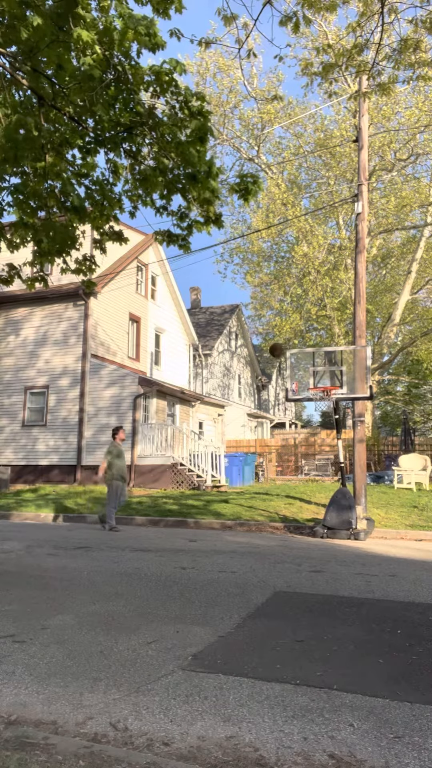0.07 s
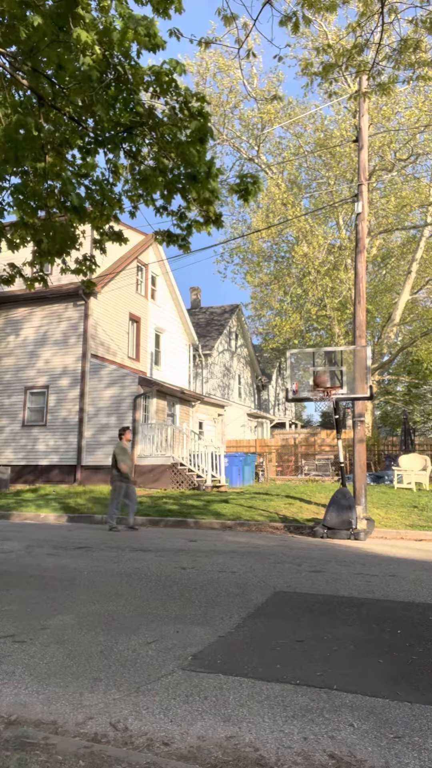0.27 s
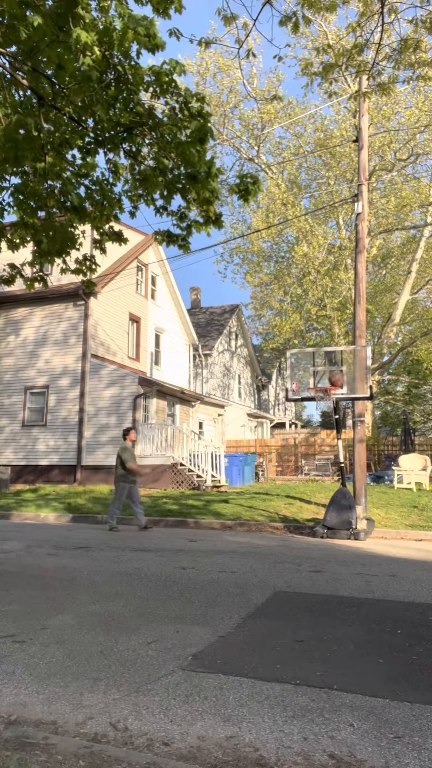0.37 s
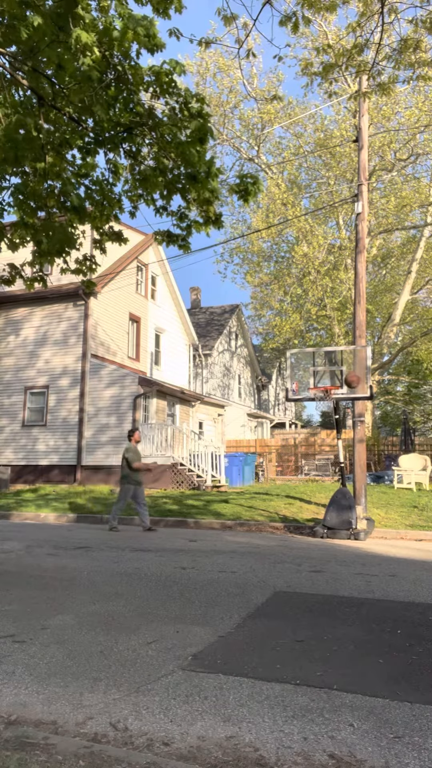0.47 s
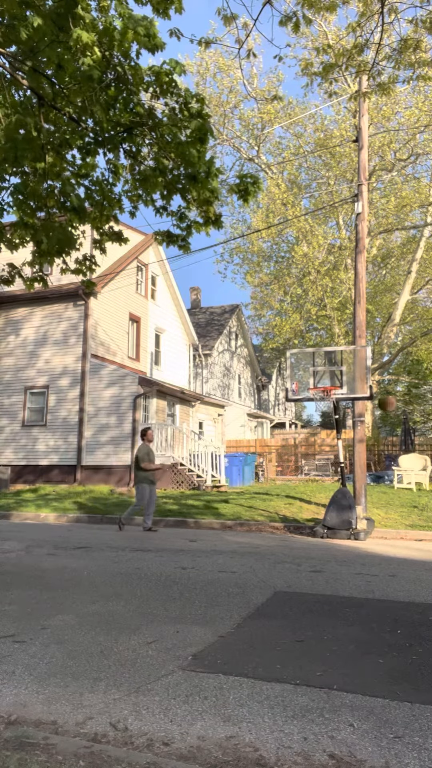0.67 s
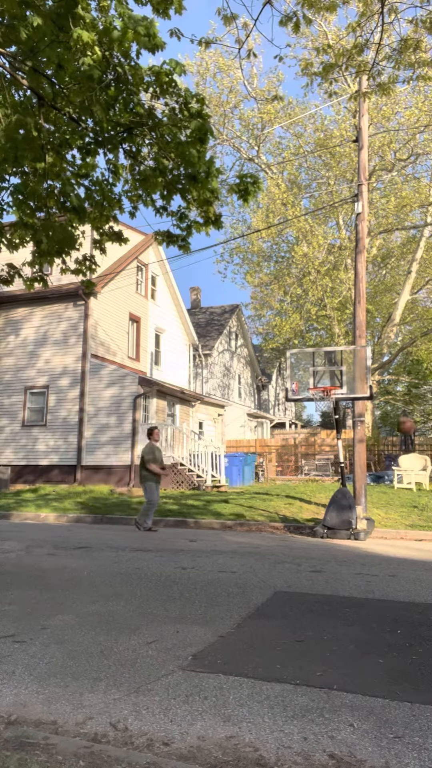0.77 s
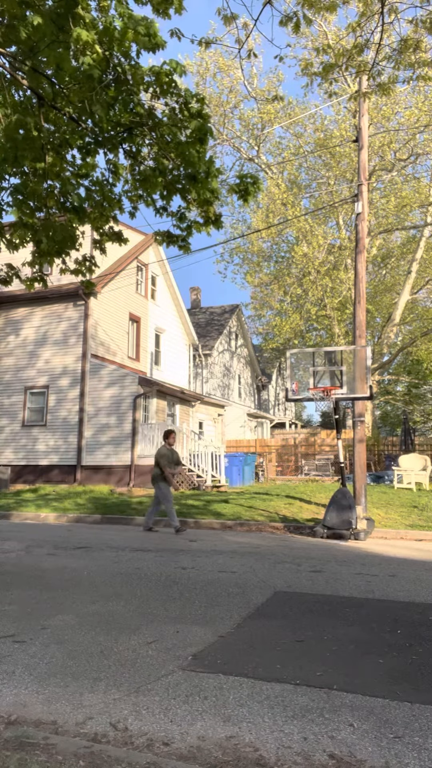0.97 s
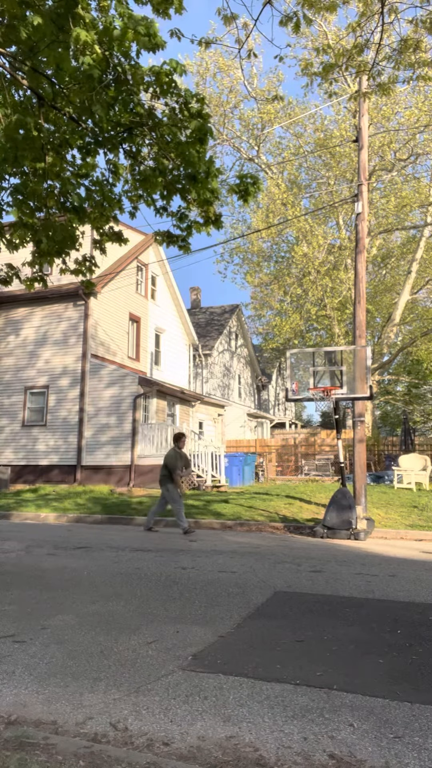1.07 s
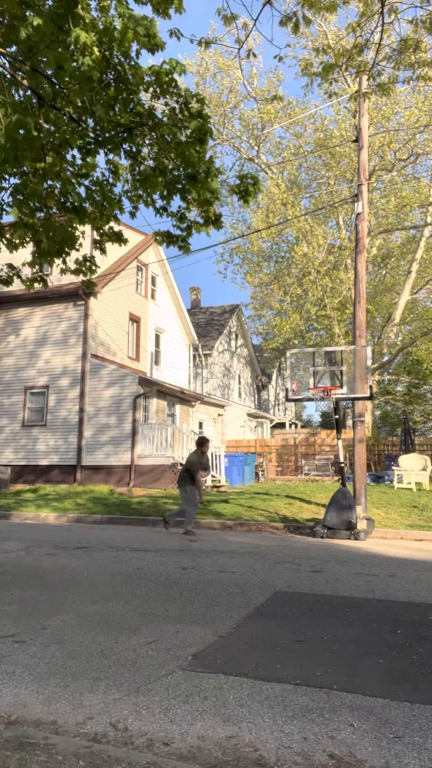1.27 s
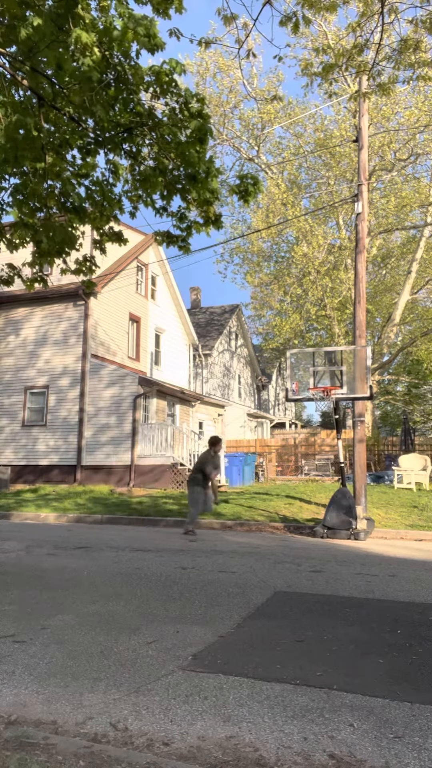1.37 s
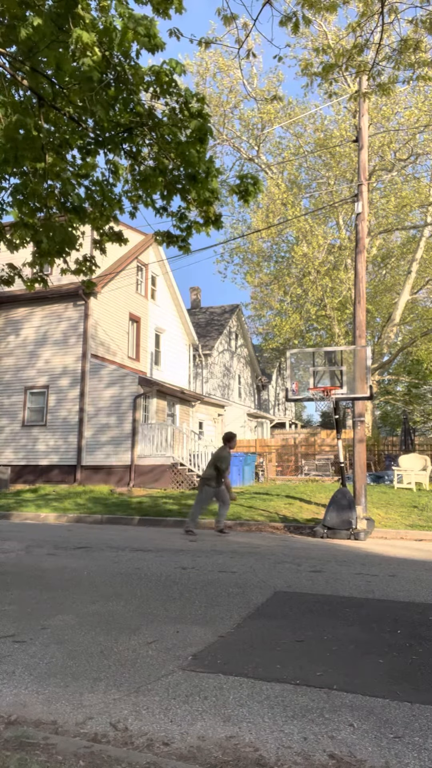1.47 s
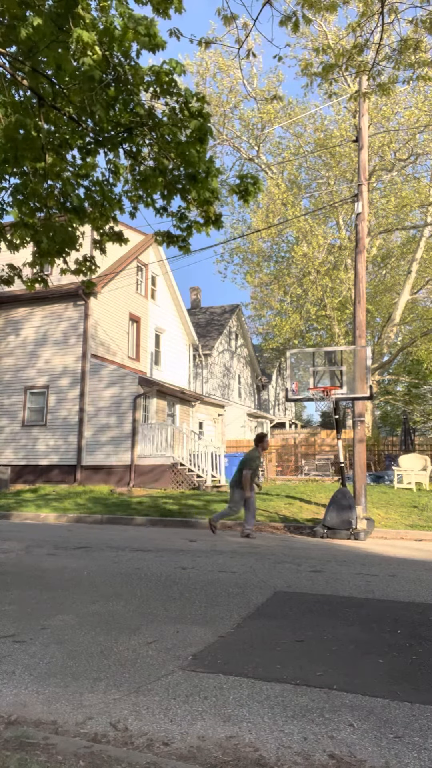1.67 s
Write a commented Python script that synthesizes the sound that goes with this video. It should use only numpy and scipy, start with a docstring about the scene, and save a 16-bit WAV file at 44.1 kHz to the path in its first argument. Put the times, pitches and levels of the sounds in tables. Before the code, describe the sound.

A basketball bangs off a backboard and rim outdoors, then bounces once amid light footsteps.

```python
"""Far birds whistle over a low outdoor rumble. A basketball crashes into a portable hoop:
the board booms, the rim and its fittings rattle, and the house fronts throw the sound back.
While the frame drones and the net hisses away, a shoe scuffs the asphalt.
The ball bounces once on the street: its skin slaps and the air inside it rings.
A few more gritty steps follow."""
import sys
import numpy as np
from scipy import signal
from scipy.fft import rfft, irfft
from scipy.io import wavfile

SR = 44100
rng = np.random.default_rng(int(sys.argv[2]) if len(sys.argv) > 2 else 0)


def pcm_store(signal):
    """Save signal as 16-bit PCM."""
    levels = np.round(np.clip(np.atleast_2d(signal), -1, 1) * 32767)
    wavfile.write(sys.argv[1], SR, levels.astype(np.int16).T)


N = 74970
T = np.arange(N) / SR
HZ = np.fft.rfftfreq(2 * N, 1 / SR)
HIT_S, BOUNCE_S = .2438, 1.054  # the ball hits the hoop, then the street


# Ringing tones of the hoop: pitch_hz, level_db, rise_s, fade_s
HOOP_TONES = [(57.9, -31.5, .03, 2.0), (130.9, -23.5, 0.03, .6), (196.1, -19.5, .008, 0.6),
              (215.6, -10.5, 0.01, .4), (241.6, -10.5, .008, 0.11), (260.3, -18, .012, 0.36),
              (314, -21.5, 0.0043, 0.19), (379.7, -28.5, 0.013, 0.38), (422.6, -33.5, .01, 0.14),
              (628, -10.5, .007, .13), (776, -19.5, 0.0014, 0.11), (840.5, -14.5, 0.0018, 0.11),
              (915, -25.5, 0.0017, 0.15), (1261, -25, 0.0035, 0.2), (1586, -26.5, .002, .1),
              (3514, -35.5, .001, .11)]
# Swells as board and frame bend: peak_s, pitch_hz, level_db, width_s
HOOP_BOOMS = [(0.261, 139.4, -23.5, 0.021), (.2717, 225.7, -6, 0.0084), (.344, 134.7, -21, .02),
              (0.474, 130.5, -23, 0.033)]

def hoop_body():
    """The struck board, rim and frame boom and ring."""
    return ring(HIT_S, HOOP_TONES) + sum(thump(*row) for row in HOOP_BOOMS)


# Touches of ball, board and rim: start_s, level_db, fade_s
CONTACTS = [(.224, -41.5, 0.12), (.2355, -24, 0.27), (.2438, -15, 0.022), (.261, -19, 0.054),
            (.383, -43.5, .07), (.548, -51, 0.12)]
# Tone colour of the clatter and of the loose fittings: pitch_hz, level_db
CLATTER_COLOUR = [(100, -4), (400, 7.5), (520, 4), (800, 9), (1080, 1.5), (1800, 5), (2500, -3),
                  (5000, -10), (7100, -7), (8300, -32.5), (10500, -28), (12000, -25), (15000, -31.5)]

def hoop_clatter():
    """The ball grinds into board and rim."""
    return filtered(bursts(CONTACTS), colour(CLATTER_COLOUR))


def rattle(level_db=-22.5, fade_s=.28, jangle_db=1.5, jangle_hz=120):
    """Loose fittings jangle on unevenly after the hit."""
    jangle = evened(filtered(rng.standard_normal(N), np.exp(-(HZ / jangle_hz) ** 2)))
    shaking = diffuse() * amp(level_db + jangle_db * jangle) * fade(HIT_S, fade_s)
    return filtered(shaking, colour(CLATTER_COLOUR))


# The frame's many low tones, blurred together: pitch_hz, level_db
FRAME_COLOUR = [(60, -27.5), (120, 0), (170, 2), (230, -2), (290, -5), (420, -11.5), (520, -19.5),
                (2000, -54)]
# Hiss of the net: pitch_hz, level_db
NET_COLOUR = [(1000, -14.5), (6500, -0.5), (9000, -15.5), (11800, -2.5), (14000, -4.5), (15200, -21)]

def frame_and_net(frame_db=-23, net_db=-58, rise_s=.02):
    """The frame drones unevenly while the shaken net hisses away."""
    swell = 1 - np.exp(-np.maximum(T - HIT_S, 0) / rise_s)
    frame = diffuse() * amp(frame_db) * swell * fade(HIT_S, fade_s=.87)
    net = diffuse() * amp(net_db) * fade(HIT_S, fade_s=.9)
    return filtered(frame, colour(FRAME_COLOUR)) + filtered(net, colour(NET_COLOUR))


# The ball's slap and two close echoes: start_s, level_db, fade_s
SLAPS = [(1.054, -22.5, 0.021), (1.0622, -23.5, 0.041), (1.079, -38, 0.04)]
# Tone colour of the slap: pitch_hz, level_db
SLAP_COLOUR = [(100, 1.5), (450, 2.5), (750, -11.5), (1150, -4), (1400, -5.5), (1950, -5.5), (2400, -23.5),
               (6500, -34), (8500, -45.5), (14000, -46)]
# Grit crunching under the ball: pitch_hz, level_db
CRUNCH_COLOUR = [(500, 7), (2800, -4), (6500, -11.5), (8500, -14), (13000, -7), (15500, -30)]

def ball_slap(smack_db=-16.5, crunch_db=-32, crunch_fade_s=.014):
    """The ball's skin meets gritty asphalt with a smack that drops quickly in pitch."""
    from_hz, to_hz, glide_s, peak_s = 2300, 350, .0022, .0014
    t = np.maximum(T - BOUNCE_S, 0)
    cycles = to_hz * t + (from_hz - to_hz) * glide_s * (1 - np.exp(-t / glide_s))
    smack = amp(smack_db) * t / peak_s * np.exp(1 - t / peak_s) * np.sin(2 * np.pi * cycles)
    crunch = filtered(bursts([(BOUNCE_S, crunch_db, crunch_fade_s)]), colour(CRUNCH_COLOUR))
    return smack + crunch + filtered(bursts(SLAPS), colour(SLAP_COLOUR))


# Tones of the air inside the ball: pitch_hz, level_db, rise_s, fade_s
BALL_TONES = [(252, -14.5, 0.0043, 0.066), (339, -19.5, 0.0038, 0.091), (468.7, -16.5, .003, 0.089),
              (1115, -20, 0.004, 0.068), (1764, -29.5, 0.00069, 0.098)]

def ball_ping():
    """The bounce sets the air inside the ball ringing."""
    return ring(BOUNCE_S, BALL_TONES)


def ball_push():
    """The bouncing ball gives the air around it one low push."""
    return thump(peak_s=1.0685, hz=137.7, db=-6.5, width_s=.0039)


# Shoes on asphalt: start_s, level_db, fade_s, grit_db (added to level_db for the grit)
STEPS = [(.661, -44, 0.049, -30), (1.172, -58, .035, 7.5), (1.392, -67.5, 0.0091, 12.5),
         (1.498, -65.5, .04, 1.5), (1.584, -36.5, 0.0079, 0.5), (1.59, -45, 0.089, -5.5),
         (1.652, -58.5, 0.065, -6)]
# Tone colour of the sole: pitch_hz, level_db
SOLE_COLOUR = [(150, -7), (800, -1.5), (1300, -5.5), (1950, 7), (2500, -10), (8000, -41.5)]
# Tone colour of the grit under it: pitch_hz, level_db
GRIT_COLOUR = [(500, -24.5), (2800, 7), (4500, -22.5), (7000, 1), (9000, -27.5), (14000, -31)]

def shoes(right_lag_s=.0002):
    """Soles tap on bright grit. The player is on the left, so the right ear hears it later."""
    sole = bursts([(s, db, fade_s) for s, db, fade_s, _ in STEPS])
    grains = bursts([(s, db + grit_db, fade_s) for s, db, fade_s, grit_db in STEPS])
    steps = filtered(sole, colour(SOLE_COLOUR)) + filtered(grains, colour(GRIT_COLOUR))
    return np.array([steps, filtered(steps, delay(right_lag_s))])


# How a house front colours its echo: pitch_hz, gain_db
HOUSE_COLOUR = [(60, -13), (130, -9.5), (220, -11.5), (350, 0), (650, -14.5), (3000, -22.5), (14000, -20)]

def house_echo(x, delay_s=.139, gain_db=-10.5):
    """A house front throws the sound back once."""
    return amp(gain_db) * filtered(x, colour(HOUSE_COLOUR, keep_power=False) * delay(delay_s))


# How long the street echoes: pitch_hz, fade_s (multiplied by fade_scale)
STREET_FADES = [(100, 1), (500, 0.92), (2000, 0.93), (4000, 0.82), (7000, 0.79), (14000, 0.68)]
# Tone colour of those echoes: pitch_hz, gain_db
STREET_COLOUR = [(60, -17), (200, -13.5), (500, -14), (800, -10.5), (1900, -17.5), (2500, -12.5),
                 (4000, -6.5), (7000, -19), (14000, -15.5)]

def street_echoes(x, rise_s, fade_scale=1):
    """Houses and trees scatter the sound; the high pitches die away soonest."""
    hz, t, bands = signal.stft(diffuse(), SR, nperseg=256)
    fade_s = fade_scale * read(STREET_FADES, hz)[:, None]
    tail = signal.istft(bands * np.exp(-np.log(1000) * t / fade_s), SR, nperseg=256)[1][:, :N]
    tail *= 1 - np.exp(-T / rise_s)
    echoes = filtered(x, rfft(tail / np.linalg.norm(tail[0]), 2 * N))
    return filtered(echoes, colour(STREET_COLOUR, keep_power=False))


# What the slap sends out into the street: pitch_hz, gain_db
SLAP_SPREAD = [(100, 6.5), (300, 2), (600, -4), (1150, -2), (1500, 3.5), (2050, 6), (2400, -3), (7000, 8)]

def bounce_echoes(slap, push):
    """The bounce spreads into the street and comes back as a soft wash."""
    thrown = amp(-2) * filtered(slap, colour(SLAP_SPREAD, keep_power=False))
    return street_echoes(thrown + amp(-9) * push, rise_s=.04, fade_scale=.79)


# Low thuds: peak_s, pitch_hz, level_db, width_s
THUDS = [(0.888, 71, -28, 0.0053), (0.926, 77.6, -25, 0.0045), (1.162, 89.5, -34.5, 0.0086)]

def soft_thuds():
    """Soft, low thuds come just before and after the bounce."""
    return sum(thump(*row) for row in THUDS)


# Bird whistles: start_s, length_s, start_hz, end_hz, level_db, width_hz
WHISTLES = [(0., 0.27, 4000, 3220, -78, 350), (0.484, 0.497, 3097, 3030, -75, 29.63),
            (0.827, .12, 4380, 3770, -70, 800), (0.937, 0.21, 3630, 3100, -69, 380)]

def birds(glide_curve=2.2, pure_width_hz=120):
    """Nearly steady and falling whistles, blurred by distance; narrow ones sound purer."""
    out = np.zeros((2, N))
    for start_s, length_s, start_hz, end_hz, db, width_hz in WHISTLES:
        progress = np.clip((T - start_s) / length_s, 0, 1)
        hz = end_hz + (start_hz - end_hz) * (1 - progress) ** glide_curve
        noise = evened(filtered(rng.standard_normal((2, 2, N)), np.exp(-(2 * HZ / width_hz) ** 2)))
        purity = np.exp(-width_hz / pure_width_hz)
        blur = np.sqrt(purity) + np.sqrt(1 - purity) * noise
        phase = 2 * np.pi * np.cumsum(hz) / SR
        swell = np.sqrt(abs(np.sin(np.pi * progress)))
        out += amp(db) * swell * (blur[0] * np.cos(phase) + blur[1] * np.sin(phase))
    return out


# Tone colour of the outdoor hush: pitch_hz, level_db
HUSH_COLOUR = [(20, -27.5), (55, -2), (100, -6.5), (165, -4), (200, -14), (300, -13.5), (500, -20.5),
               (1000, -28), (2050, -36), (2450, -45.5), (4000, -49.5), (7000, -58.5), (9000, -71),
               (15000, -65.5)]
# Tone colour of the rumble: pitch_hz, level_db
RUMBLE_COLOUR = [(20, -33), (45, -11), (65, 0), (105, -13), (200, -24), (1000, -76)]
# How the rumble rises and falls: time_s, level_db
RUMBLE_LEVELS = [(0, -48.5), (.6, -44.5), (.74, -34), (.8, -38.5), (1.1, -47), (1.16, -35), (1.33, -57.5),
                 (1.55, -48), (1.7, -39)]

def outdoor_air(hush_db=-47):
    """A steady hush lies over an uneven low rumble."""
    hush = evened(filtered(diffuse(), colour(HUSH_COLOUR)))
    rumble = evened(filtered(diffuse(), colour(RUMBLE_COLOUR)))
    rumble_db = np.interp(T, *np.transpose(RUMBLE_LEVELS))
    return amp(hush_db) * hush + amp(rumble_db) * rumble


# How alike the two ears hear the noise: pitch_hz, likeness (1 the same, -1 or less opposite)
EAR_LIKENESS = [(150, 0.97), (290, 0.87), (640, .35), (1400, -0.37), (3000, 0.12), (6000, -0.25),
                (14000, -1.2)]

def diffuse():
    """Noise from all sides: alike in both ears only in the bass."""
    a, b = rng.standard_normal((2, N))
    likeness = np.clip(read(EAR_LIKENESS, HZ), -1, 1)
    shared = filtered(a, np.sqrt((1 + likeness) / 2))
    opposite = filtered(b, np.sqrt((1 - likeness) / 2))
    return np.array([shared + opposite, shared - opposite])


# Balance between the ears: pitch_hz, left_minus_right_db
EAR_BALANCE = [(100, -.5), (380, -1.5), (700, -5.5), (1050, -4), (1300, 0.5), (1650, 4.5), (2400, 4.5),
               (4300, 17.5), (7000, -2.5), (14000, 3.5)]

def from_right(x, left_lag_s=.00015):
    """Sound from the right reaches the left ear later and with a different colour."""
    left_gain = amp(read(EAR_BALANCE, HZ) / 2)
    return filtered(x, np.array([left_gain * delay(left_lag_s), 1 / left_gain]))


def amp(db):
    """Turns decibels into a number to multiply by."""
    return 10 ** (np.asarray(db) / 20)


def evened(x):
    """Scales a signal to an average power of one."""
    return x / np.sqrt(np.mean(x ** 2) + 1e-20)


def read(points, hz):
    """Reads between the rows of a table, spacing pitches by octaves."""
    pitches, values = np.transpose(points)
    return np.interp(np.log(hz + 1), np.log(pitches + 1), values)


def filtered(x, response):
    """Passes a sound through a filter."""
    return irfft(rfft(x, 2 * N) * response)[..., :N]


def delay(seconds):
    """A filter that makes a sound arrive later."""
    return np.exp(-2j * np.pi * HZ * seconds)


def colour(points, keep_power=True):
    """A filter from a table of pitches; by default white noise keeps its power."""
    gain = amp(read(points, HZ))
    cepstrum = irfft(np.log(evened(gain) if keep_power else gain))
    cepstrum[1:N] *= 2  # folded forward, so nothing rings before the sound starts
    cepstrum[N + 1:] = 0
    return np.exp(rfft(cepstrum))


def fade(start_s, fade_s):
    """Starts suddenly, then drops by 60 dB every fade_s."""
    return (T >= start_s) * np.exp(-np.log(1000) * np.maximum(T - start_s, 0) / fade_s)


def bursts(rows):
    """Dying puffs of noise, one per row."""
    return sum(amp(db) * fade(s, fade_s) for s, db, fade_s in rows) * rng.choice([-1., 1.], N)


def ring(start_s, tones):
    """Tones that build up and die away."""
    t = np.maximum(T - start_s, 0)
    return sum(amp(db) * (1 - np.exp(-t / rise_s)) ** 2 * fade(start_s, fade_s)
               * np.sin(2 * np.pi * hz * t) for hz, db, rise_s, fade_s in tones)


def thump(peak_s, hz, db, width_s):
    """A few low swings of air, strongest at peak_s."""
    t = T - peak_s
    return amp(db) * np.exp(-(t / width_s) ** 2 / 2) * np.cos(2 * np.pi * hz * t)


def scene():
    """Hoop, ball and shoes in the open street."""
    clatter, boom = hoop_clatter(), hoop_body()
    slap, push, feet = ball_slap(), ball_push(), shoes()
    hoop = clatter + boom
    near = from_right(hoop + slap + push + ball_ping() + house_echo(hoop))
    far = street_echoes(clatter + feet[0] + amp(-4.5) * boom, rise_s=.008) + bounce_echoes(slap, push)
    return near + feet + far + rattle() + frame_and_net() + soft_thuds() + birds() + outdoor_air()


def record(dry, top_hz=15300):
    """Cuts away the very highest treble."""
    low_pass = signal.firwin(511, top_hz, window=("kaiser", 9), fs=SR)
    return signal.oaconvolve(dry, low_pass[None], "same")


dry = scene()
out = record(dry)
pcm_store(out)
```